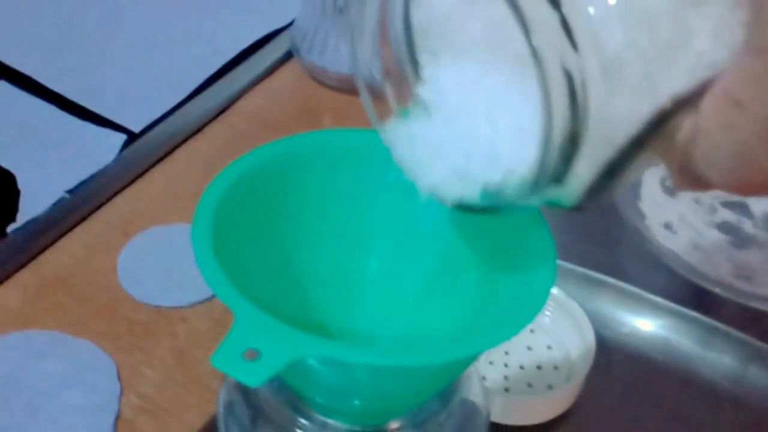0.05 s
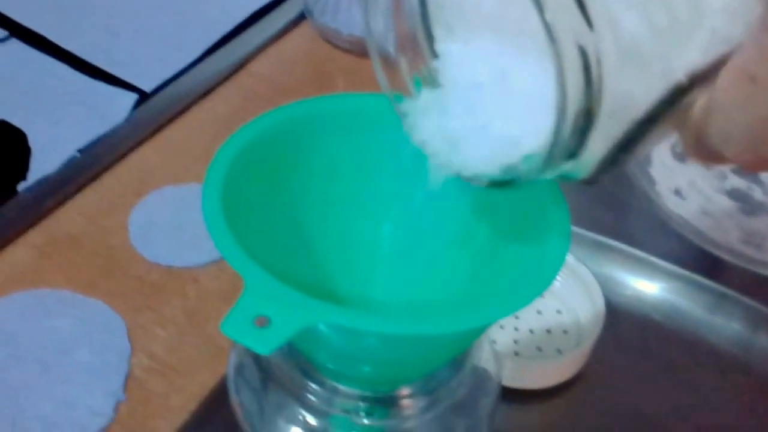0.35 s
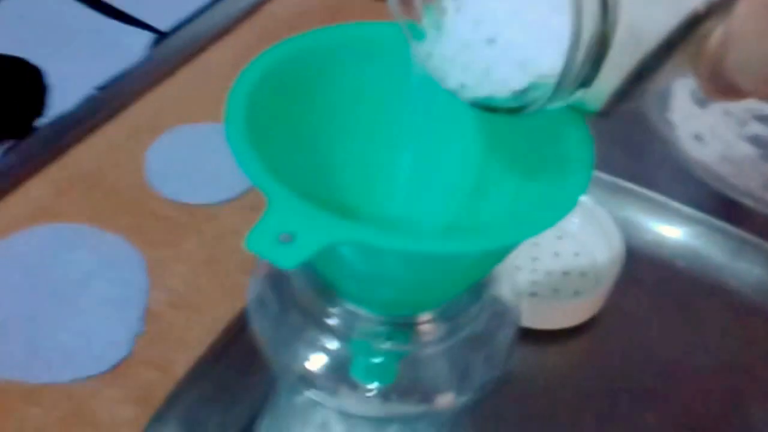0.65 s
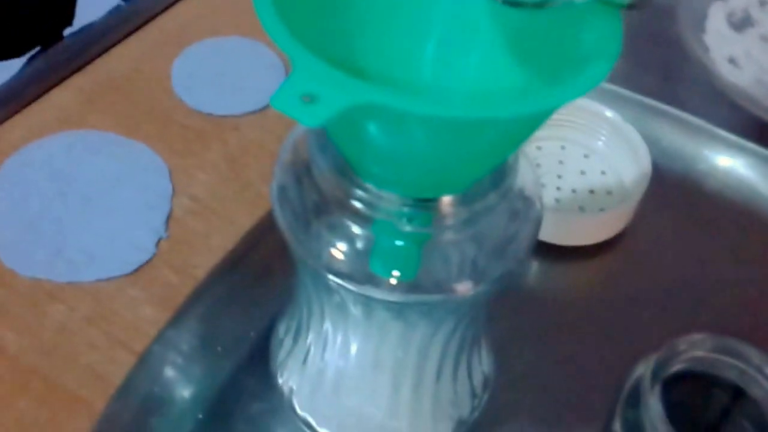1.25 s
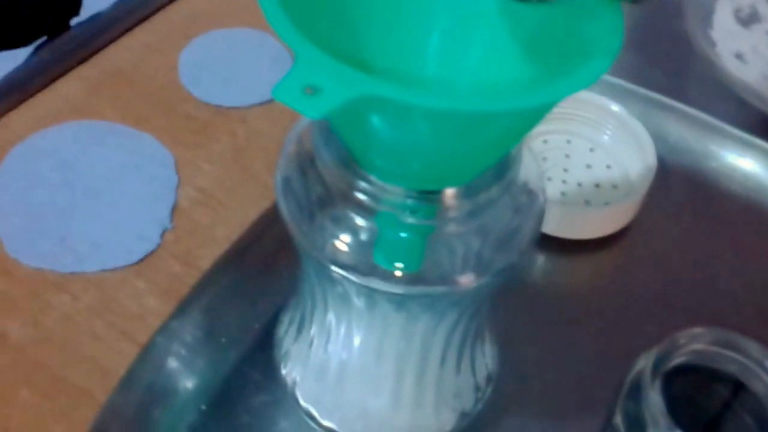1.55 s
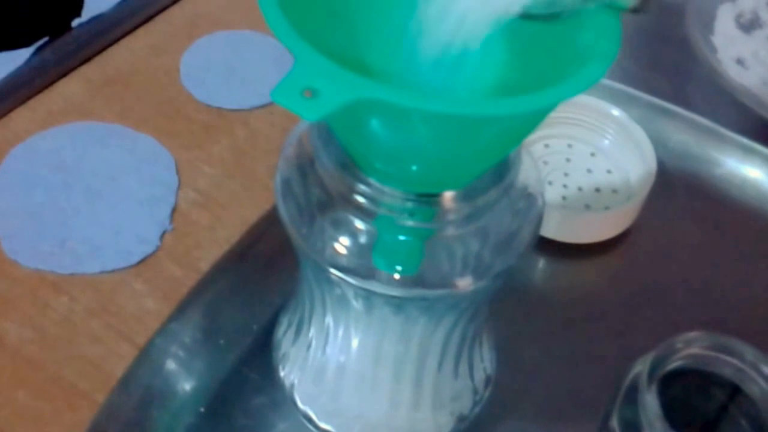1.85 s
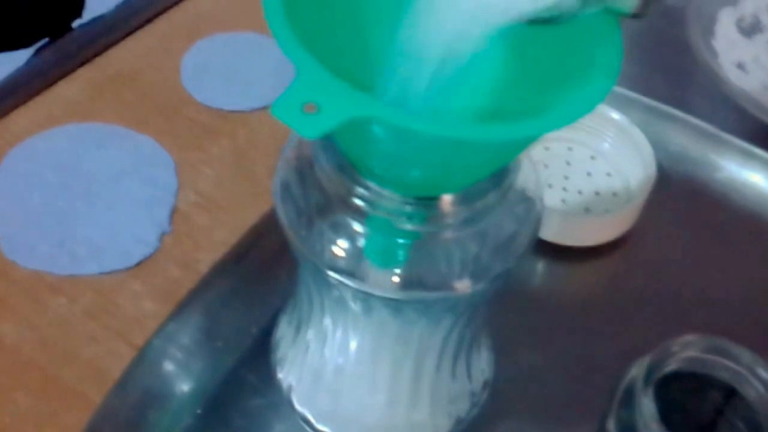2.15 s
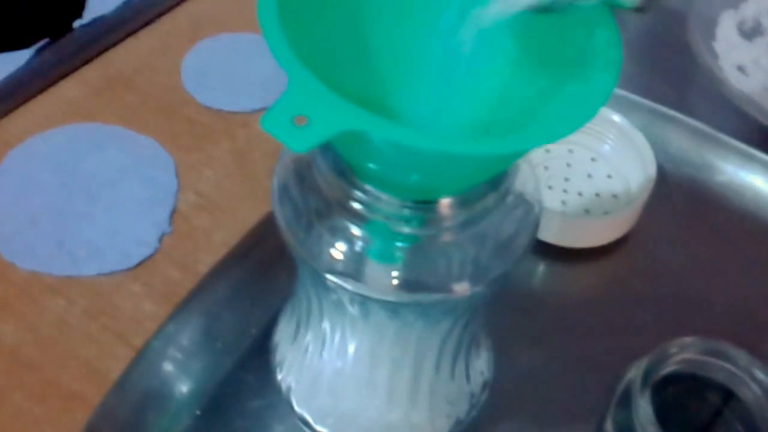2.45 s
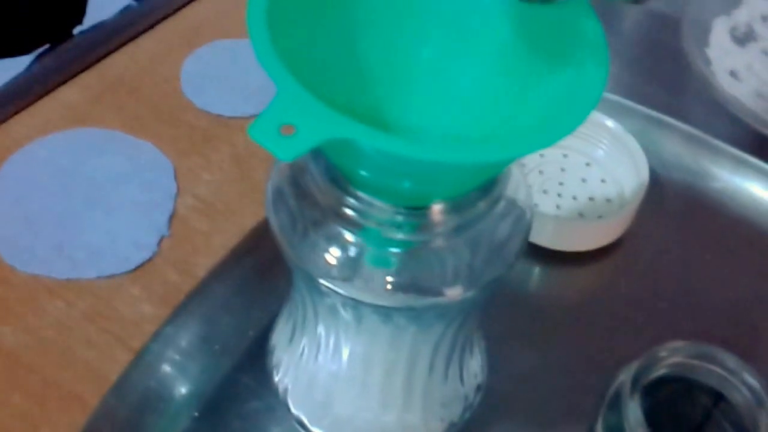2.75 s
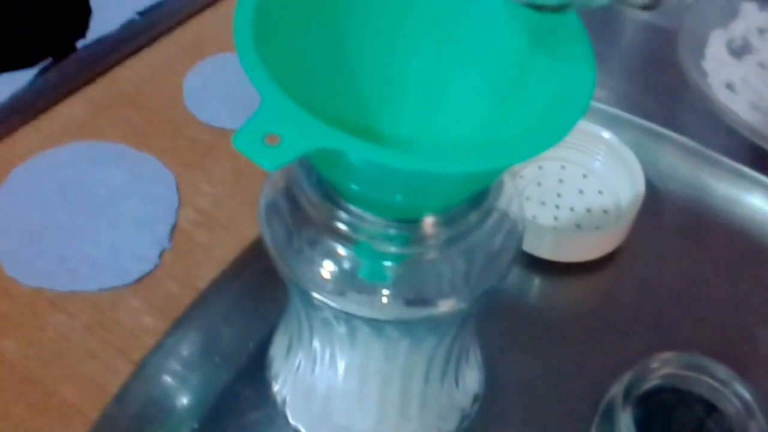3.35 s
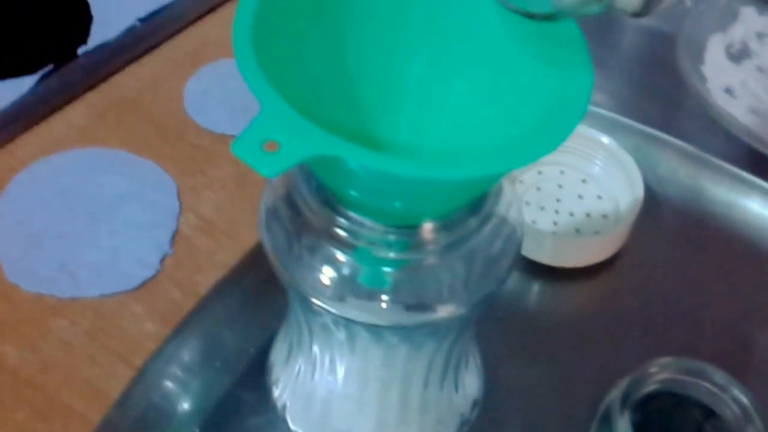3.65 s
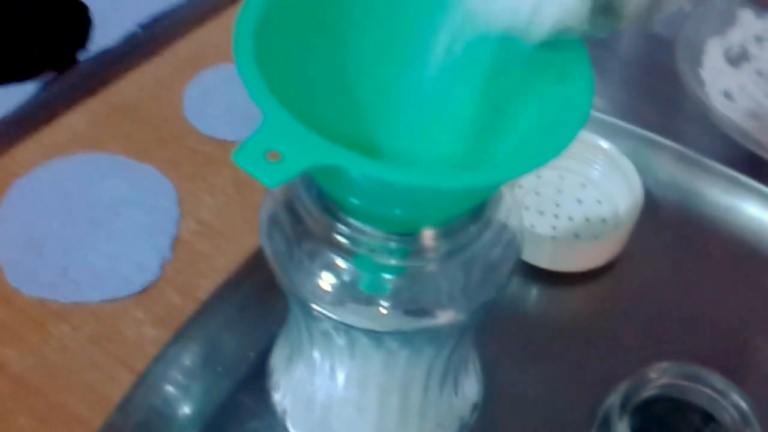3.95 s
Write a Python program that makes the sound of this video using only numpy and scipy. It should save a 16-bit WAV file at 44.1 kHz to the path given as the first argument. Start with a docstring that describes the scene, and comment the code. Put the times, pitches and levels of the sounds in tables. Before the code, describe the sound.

Slightly lumpy salt hisses and patters down a plastic funnel into glass, close up.

```python
"""Dry, slightly lumpy salt pours from a jar through a plastic funnel into a glass shaker, close, indoors.
Fine grains hiss; coarse grains tick; lumps crack on the funnel wall and crumble.
Resonances of funnel and glass colour the impacts. The jar knocks the funnel twice, two faint tones ring,
the stream runs out, and a soft handling bump follows."""
import sys
import numpy as np
from scipy import signal
from scipy.fft import rfft, irfft
from scipy.io import wavfile

SR = 44100
rng = np.random.default_rng(int(sys.argv[2]) if len(sys.argv) > 2 else 0)


def wrap_up_sound(samples):
    """Save the sound to the file named by the first command line argument, as 16-bit audio."""
    columns = np.atleast_2d(samples).T
    # keep every value between -1 and 1, then stretch to whole-number steps
    tamed = np.clip(columns, -1, 1)
    steps = np.round(tamed * 32767).astype(np.int16)
    wavfile.write(sys.argv[1], SR, steps)


N = 176400
T = np.arange(N) / SR
HZ = np.arange(4097) * SR / 8192 + 1e-3


def undb(db):
    """Decibels to gain."""
    return 10 ** (np.asarray(db) / 20)


def unit(x):
    """Scale to rms 1."""
    return x / np.sqrt(np.mean(x ** 2))


def curve(rows, column=1):
    """One table column, interpolated over time."""
    rows = np.array(rows, float)
    return np.interp(T, rows[:, 0], rows[:, column])


def slope(points):
    """Gain over frequency from (freq_hz, gain_db) points."""
    hz, db = np.array(points, float).T
    return undb(np.interp(np.log(HZ), np.log(hz), db))


def peaks(modes):
    """Gain over frequency of steep-sided resonances, summed in power."""
    gains = [undb(db) / (1 + 1.72 * ((HZ - hz) / width_hz) ** 2) ** 1.2 for hz, width_hz, db in modes]
    return np.sqrt(sum(gain ** 2 for gain in gains))


def response(gain):
    """Minimum-phase impulse response, unit energy."""
    cepstrum = irfft(np.log(gain / gain.max() + 1e-4))
    half = len(cepstrum) // 2
    causal = np.r_[cepstrum[0], 2 * cepstrum[1:half]]
    impulse = irfft(np.exp(rfft(causal, len(cepstrum))))[:half]
    return impulse / np.linalg.norm(impulse)


def ring(x, colour):
    """Pass x through a body with this gain over frequency."""
    return signal.fftconvolve(x, response(colour))[:N]


def grains(per_s, spread_db):
    """Random impacts of uneven size, rms 1."""
    size = undb(spread_db * np.clip(rng.standard_normal(N), -2, 2))
    lands = rng.random(N) < per_s / SR
    return unit(lands * size * rng.choice([-1, 1], N))


def skitter(impacts, energy_decay_s=0.0014, bounce_db=-1):
    """Grains bounce briefly after landing; rms 1."""
    samples = energy_decay_s * SR
    energy = signal.lfilter([0, 1 / samples], [1, -np.exp(-1 / samples)], impacts ** 2 + 1e-18)
    return unit(impacts + undb(bounce_db) * np.sqrt(energy) * rng.standard_normal(N))


def blows(starts_s, levels_db, colour, contact_s, decay_s, strike_db=7):
    """Strikes with brief chatter on a body; level is the rms with all energy inside contact_s."""
    out, body = np.zeros(N + SR), response(colour)
    t = np.arange(512) / SR
    envelope = np.exp(-t / decay_s) / (1 + (t / contact_s) ** 8)
    chatter = rng.standard_normal((len(starts_s), len(t))) * envelope
    chatter[:, 0] = np.sign(chatter[:, 0]) * undb(strike_db)
    for start_s, level_db, force in zip(starts_s, levels_db, chatter):
        hit = signal.fftconvolve(force, body)
        at = int(start_s * SR)
        out[at:at + len(hit)] += hit * undb(level_db) * np.sqrt(contact_s * SR) / np.linalg.norm(hit)
    return out[:N]


# room noise spectrum: freq_hz, gain_db
AIR_COLOUR = [(25, -13), (60, -18.5), (105, 8.5), (150, -0.5), (220, 4.5), (500, -8.5), (900, 7.5),
              (2000, -13.5), (15000, -13)]


def room_air(level_db=-77):
    """Steady noise of a quiet room."""
    return undb(level_db) * ring(rng.standard_normal(N), slope(AIR_COLOUR))


def room_echo(x, t60_s=0.19, echo_db=-9, delay_s=0.0032):
    """Add a short diffuse echo from tray, table and walls."""
    t = T[:SR // 2]
    tail = rng.standard_normal(len(t)) * np.exp(-np.log(1000) * t / t60_s) * (t > delay_s)
    return x + undb(echo_db) * signal.fftconvolve(x, tail / np.linalg.norm(tail))[:N]


# lingering tones: start_s, pitch_hz, level_db, swell_s, t60_s
TONES = [(1.645, 3390, -47.5, .002, .14), (3.66, 802, -62.5, 0.056, 0.75)]


def faint_tones():
    """Glassy sine tones swell and die away."""
    out = np.zeros(N)
    for start_s, pitch_hz, level_db, swell_s, t60_s in TONES:
        age_s = np.maximum(T - start_s, 0)
        envelope = (1 - np.exp(-age_s / swell_s)) * np.exp(-np.log(1000) * age_s / t60_s)
        out += undb(level_db) * envelope * np.sin(2 * np.pi * pitch_hz * age_s)
    return out


# pushes on the table: start_s, level_db
BUMPS = [(2.146, -60), (2.166, -58), (3.899, -72), (3.916, -62.5), (3.933, -59.5), (3.948, -66)]
# table resonances: freq_hz, width_hz, gain_db
TABLE_MODES = [(280, 103, -6), (486, 93, -2.5), (710, 160, -15)]


def table_bumps():
    """Soft handling bumps excite the table."""
    starts_s, levels_db = np.array(BUMPS).T
    return blows(starts_s, levels_db, peaks(TABLE_MODES), contact_s=0.013, decay_s=0.006)


# jar against funnel: start_s, level_db
KNOCKS = [(2.1869, -34.5), (2.561, -43.5)]
# knock spectrum: freq_hz, gain_db
KNOCK_COLOUR = [(120, -27), (260, -13), (350, 8), (510, -25), (650, -0.5), (1000, -8), (1500, 10),
                (1750, 0.5), (2050, -42), (2400, -0.5), (3000, -44), (8000, -43)]


def jar_knocks(boost_db=3.5):
    """The jar knocks dully on the funnel."""
    starts_s, levels_db = np.array(KNOCKS).T
    return blows(starts_s, levels_db + boost_db, slope(KNOCK_COLOUR), contact_s=0.0035, decay_s=0.0036)


# funnel and glass resonances, low to high, shared with the stream: freq_hz, width_hz, gain_db
HOLLOW_MODES = [(225, 79, -23), (352.6, 44, -3), (418, 51, -5)]
WALL_MODES = [(636, 78, -10), (765, 94, -10.5), (920, 120, -13.5), (1051, 66, -6), (1214, 90, -0.5),
              (1449, 195, 2), (1671, 197, 0), (2240, 93, -10)]
SHELL_MODES = [(2693, 400, -1.4), (3552, 405, 0.54), (3997, 200, -0.89)]
SPOUT_MODES = [(5323, 320, -8.5), (6166, 364, 2.5)]
# grain tick spectrum, shared with the stream: freq_hz, gain_db
TICK_COLOUR = [(1500, -34), (3000, -26), (4600, -10), (5700, -6), (6800, -0.5), (8000, -1), (9400, -5),
               (10300, -7), (12500, -12), (14400, -19), (15800, -31)]
# lump landings: start_s, level_db, wall_share_db, treble_share_db, crumb_share_db
LUMPS = [(0.0206, -44, -13, -5, -1), (0.0362, -27, -15, -11, -11), (0.0558, -31, -17, -9, -7),
         (0.0694, -32, -27, -4, -6), (0.0838, -28, -13, -15, -12), (0.1796, -41, -19, 0, -14),
         (0.2061, -39, -10, -2, -2), (0.2195, -38, -14, -2, -6), (0.2796, -37, -13, -11, -14),
         (0.3277, -32, -13, -7, -5), (0.3643, -43, -21, 0, 0), (0.3757, -38, -9, -6, -6),
         (0.4078, -32, -16, -9, -14), (0.4744, -42, -19, -6, -8), (0.5464, -41, -12, -7, -2),
         (0.6149, -39, -12, -1, -5), (0.7088, -48, -17, -1, 0), (0.73, -37, -8, -3, -2),
         (0.7459, -41, -13, 3, -5), (0.7754, -41, -7, -7, -14), (0.8332, -41, -15, -7, -8),
         (0.8541, -37, -12, -6, -2), (0.8934, -38, -7, -7, -5), (0.9446, -37, -23, -11, -9),
         (0.9732, -35, -14, -9, -7), (1.0054, -38, -14, -1, -5), (1.0366, -42, -20, 0, -14),
         (1.1021, -40, -17, -6, -6), (1.1293, -38, -13, -3, -5), (1.153, -38, -22, -3, -14),
         (1.1971, -43, -10, 3, -6), (1.2255, -43, -12, -1, 0), (1.2813, -41, -9, -2, -5),
         (1.3004, -40, -14, -3, -12), (1.3573, -44, -16, -1, -5), (1.4029, -40, -17, 1, -14),
         (1.4964, -44, -11, 1, -6), (1.5593, -44, -18, 0, -6), (1.5947, -35, -17, -7, -14),
         (1.6473, -40, -13, 2, -8), (1.7946, -41, -10, -1, -5), (1.8592, -44, -12, 0, -3),
         (1.8921, -45, -10, 5, -4), (1.9219, -42, -18, 0, -14), (1.9486, -41, -31, -1, -14),
         (2.0702, -37, -13, 0, -14), (2.1494, -41, -13, 5, -5), (2.2371, -37, -13, -3, -2),
         (2.4702, -38, -5, -4, -1), (2.7356, -38, -5, -1, -14), (2.7543, -38, -12, -3, -1),
         (2.7725, -38, -9, -2, -8), (2.7924, -37, -20, -2, -4), (2.91, -41, -6, -2, -2),
         (2.9756, -40, -12, 0, -14), (3.0911, -37, -10, -4, -5), (3.1358, -37, -10, -3, -5),
         (3.1598, -40, -22, -1, -14), (3.1939, -34, -10, -2, -5), (3.2081, -38, -5, -16, -4),
         (3.2226, -34, -16, -9, -14), (3.2876, -44, -9, -9, -2), (3.3118, -39, -9, -3, -7),
         (3.3504, -39, -16, -5, -1), (3.3631, -36, -12, -8, -14), (3.3912, -37, -24, -6, -9),
         (3.4593, -39, -12, 0, -7), (3.4776, -38, -22, -6, -14), (3.5079, -41, -16, 0, -9),
         (3.5679, -44, -18, -4, 0), (3.6468, -49, -20, 3, 0), (3.6615, -41, -12, 2, -13),
         (3.7213, -51, -15, 5, -14), (3.7474, -46, -20, -2, -5), (3.766, -52, -25, 4, -4),
         (3.7804, -47, -27, 2, -14), (3.8223, -50, -21, -2, -14), (3.8531, -51, -23, 0, -5),
         (3.8668, -55, -30, 2, -14)]
TREBLE_HZ = 7800


def lumps(crumble_s=0.019, crumble_db=-5.5):
    """Each lump cracks on the funnel and scatters into a short spray of crumbs."""
    starts_s, level_db, wall_db, treble_db, crumb_db = np.array(LUMPS, float).T
    tick = slope(TICK_COLOUR)
    highpass = 1 / (1 + (TREBLE_HZ / HZ) ** 10)
    # colour, crack_db, spray_db
    bands = [(peaks(SHELL_MODES), -9.5, -7),
             (peaks(SPOUT_MODES), -2.5, -6),
             (tick * (1 - highpass), -3, -5),
             (tick * highpass, treble_db + 0.5, -4),
             (peaks(WALL_MODES), wall_db + 1.5, wall_db + 2),
             (peaks(HOLLOW_MODES), wall_db - 12, wall_db - 11.5)]
    crumbs = grains(per_s=4000, spread_db=3.3)
    onsets = (starts_s * SR).astype(int)
    out = np.zeros(N)
    for colour, crack_db, spray_db in bands:
        out += blows(starts_s, level_db + crack_db, colour, contact_s=0.0027, decay_s=0.002)
        onset_energy = np.bincount(onsets, undb(level_db + spray_db + crumb_db + crumble_db) ** 2, N)
        spray_energy = signal.lfilter([1], [1, -np.exp(-1 / (crumble_s * SR))], onset_energy + 1e-18)
        out += ring(crumbs * np.sqrt(spray_energy), colour)
    return out


# drive of the funnel's low resonances: time_s, wall_db, hollow_db
DRUMMING = [(0.0, -60.5, -65), (0.41, -63.5, -71), (0.6, -61.5, -73), (0.9, -69, -68), (1.15, -68, -73),
            (1.34, -66, -88), (1.89, -67, -90), (2.08, -58.5, -76), (2.24, -50.5, -58.5), (2.34, -52, -62),
            (2.61, -51.5, -60.5), (2.94, -63.5, -67), (3.32, -64, -70.5), (3.58, -67, -76),
            (3.73, -72, -94.5), (4.0, -91, -90)]


def funnel_drumming(coarse, wall_boost_db=1):
    """Coarse grains drum on the funnel's wall and stir its hollow."""
    force = unit(coarse + 0.9 * grains(per_s=700, spread_db=5.8))
    wall = ring(force * undb(curve(DRUMMING) + wall_boost_db), peaks(WALL_MODES))
    hollow = ring(force * undb(curve(DRUMMING, column=2)), peaks(HOLLOW_MODES))
    return wall + hollow


# fine grain spectrum: freq_hz, gain_db
HISS_COLOUR = [(1500, -26), (3200, -20), (4500, -11.5), (5600, -10.5), (6900, 1.5), (8000, -2), (9500, -2),
               (10600, -3.5), (12500, -5.5), (14400, -6.5), (15800, -10)]
# glass resonances: freq_hz, width_hz, gain_db
GLASS_MODES = [(8970, 1100, 4.5), (11900, 350, -9), (14100, 200, -11)]
# stream strength: time_s, level_db
FLOW = [(0,-39),(.03,-50),(.07,-43),(.13,-41.5),(.195,-51),(.22,-41),(.26,-46),(.32,-54),(.335,-41.5),(.42,-44.5),(.54,-48.5),(.62,-43.5),(.65,-42),(.70,-54.5),(.745,-43),(.79,-42.5),(.82,-56.5),(.87,-44),(1.0,-44),(1.09,-48),(1.13,-49),(1.19,-52.5),(1.22,-44.5),(1.35,-48.5),(1.58,-47.5),(1.64,-42.5),(1.695,-51.5),(1.73,-47.5),(1.79,-41),(1.84,-52),(1.91,-45.5),(1.975,-52.5),(2.02,-40),(2.15,-38),(2.46,-37),(2.8,-39),(2.88,-45),(2.95,-40),(3.04,-47.5),(3.08,-45.5),(3.1,-40.5),(3.18,-44),(3.25,-43.5),(3.29,-47.5),(3.33,-43.5),(3.52,-48),(3.555,-54.5),(3.6,-40.5),(3.68,-49),(3.81,-62),(3.88,-65),(4,-83)]


def salt_stream(reference_db=-42, fine_db=-5.5, tick_db=-6, crystal_db=-4.5, shell_db=-11.5, spout_db=-7.5):
    """Fine grains hiss, coarse grains rattle, both excite the funnel; single crystals ring the glass."""
    flow_db = curve(FLOW) - reference_db
    # a fuller stream adds mostly fine grains
    fine_gain = undb(reference_db + 1.44 * flow_db + fine_db)
    coarse_gain = undb(reference_db + 0.76 * flow_db)
    fine = grains(per_s=9000, spread_db=4.5) * fine_gain
    coarse = skitter(grains(per_s=900, spread_db=7))
    rattle = coarse * coarse_gain
    hiss = ring(fine, slope(HISS_COLOUR))
    ticks = undb(tick_db) * ring(rattle, slope(TICK_COLOUR))

    crystal_colour = slope(HISS_COLOUR) / (1 + (TREBLE_HZ / HZ) ** 4) + undb(-4.5) * peaks(GLASS_MODES)
    crystal_hits = skitter(grains(per_s=300, spread_db=5)) * coarse_gain
    crystals = undb(crystal_db) * ring(crystal_hits, crystal_colour)

    force = rattle + undb(-5) * fine
    shell = undb(shell_db) * ring(force, peaks(SHELL_MODES))
    spout = undb(spout_db) * ring(force, peaks(SPOUT_MODES))
    return hiss + ticks + crystals + shell + spout + funnel_drumming(coarse)


def scene():
    """Salt and handling in a quiet room, mono."""
    air = room_air()
    impacts = salt_stream() + lumps() + jar_knocks() + table_bumps()
    return (room_echo(impacts) + faint_tones() + air)[None]


def record(dry, low_hz=60, top_hz=15650):
    """Gentle bass roll-off, steep top cut."""
    thinned = signal.sosfilt(signal.butter(1, low_hz, "high", fs=SR, output="sos"), dry)
    return signal.sosfilt(signal.ellip(12, 0.2, 80, top_hz, fs=SR, output="sos"), thinned)


dry = scene()
out = record(dry)
wrap_up_sound(out)
```